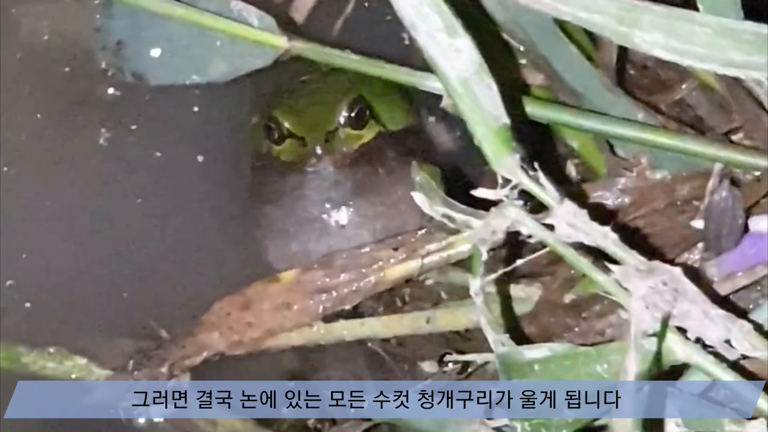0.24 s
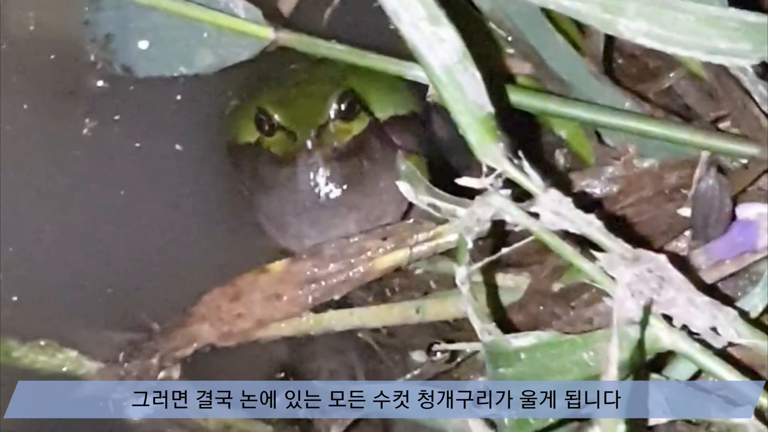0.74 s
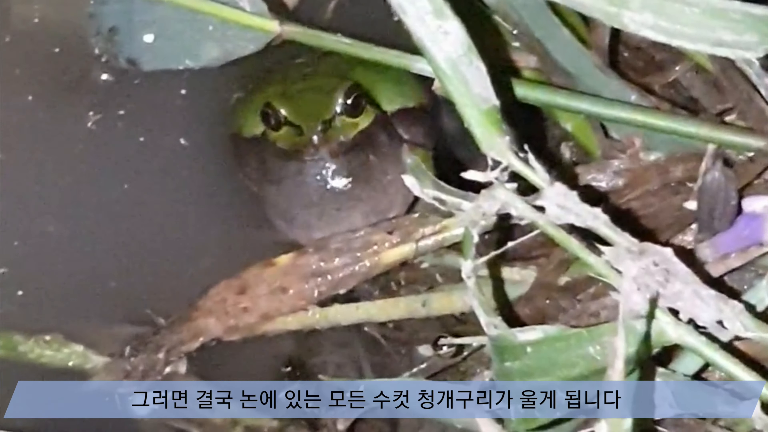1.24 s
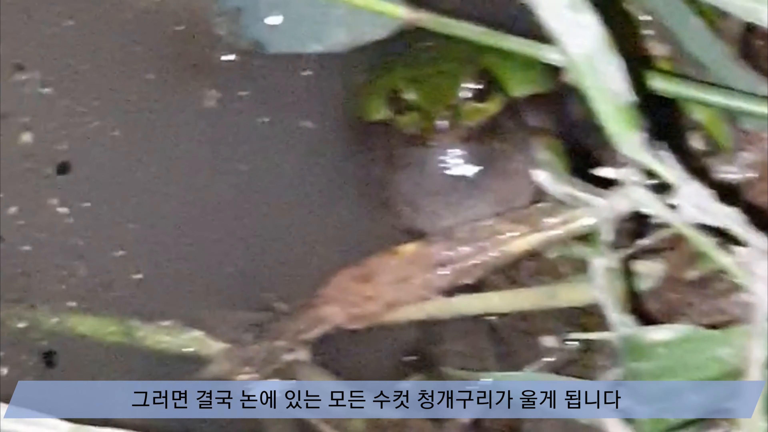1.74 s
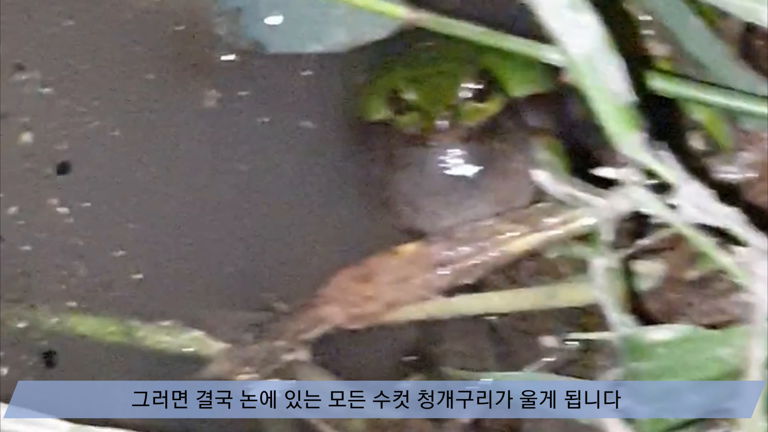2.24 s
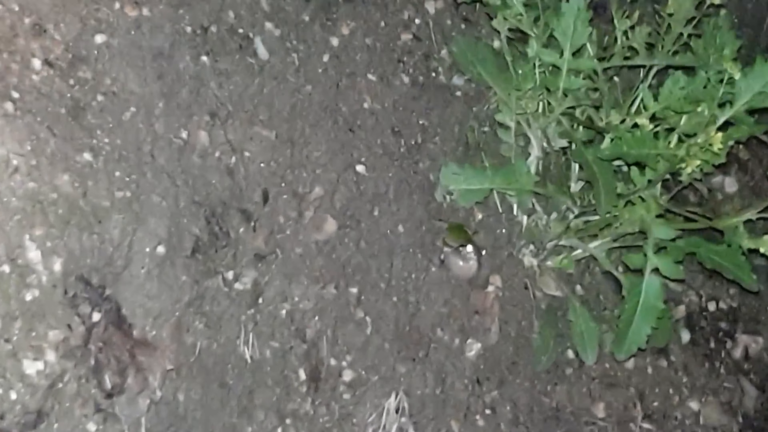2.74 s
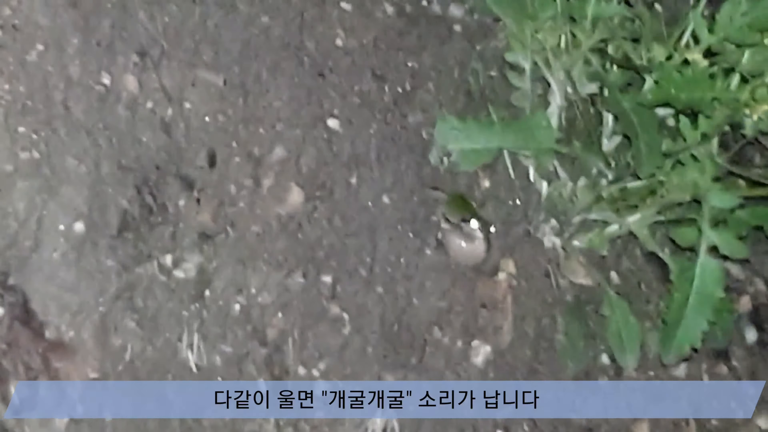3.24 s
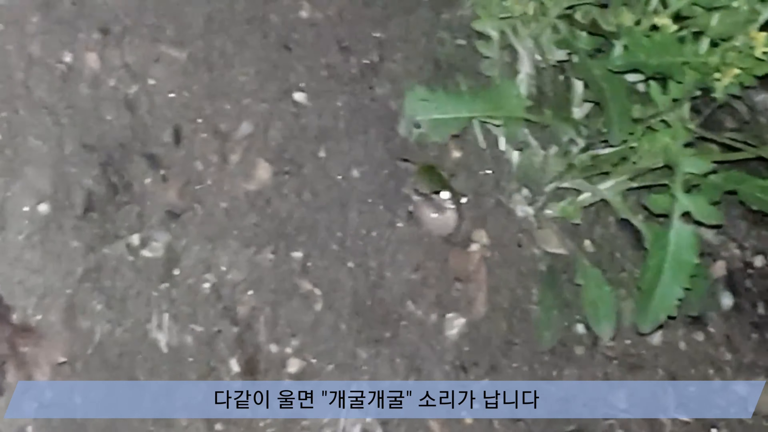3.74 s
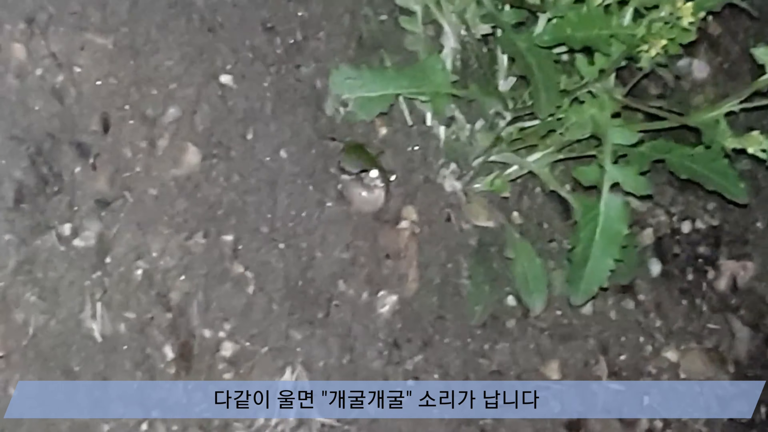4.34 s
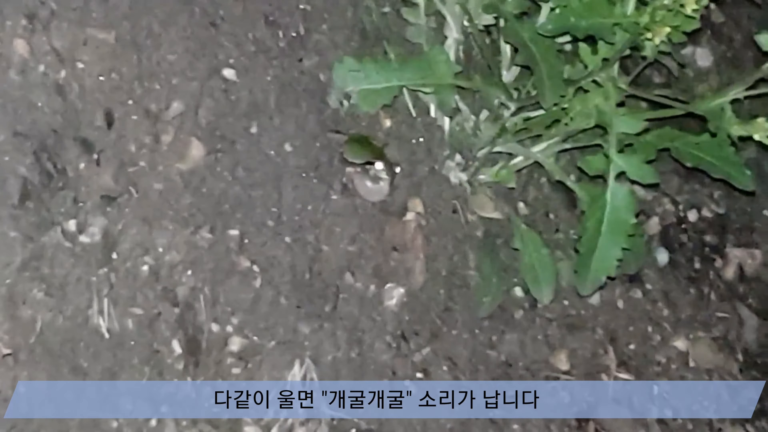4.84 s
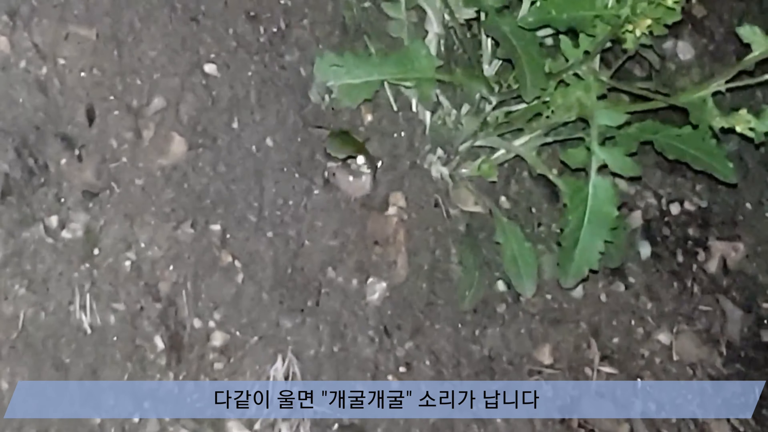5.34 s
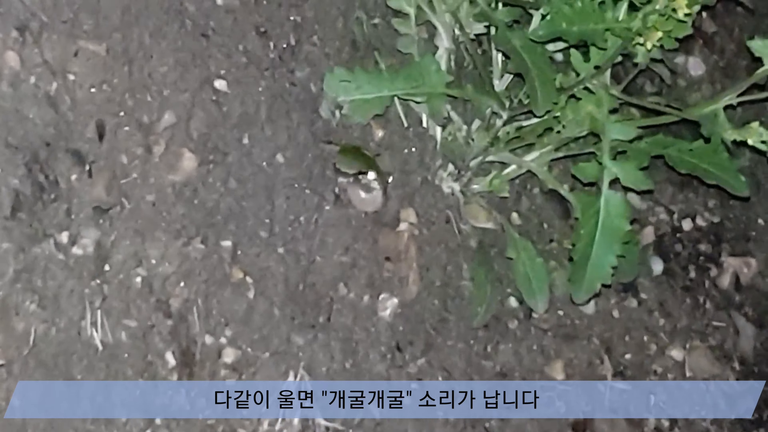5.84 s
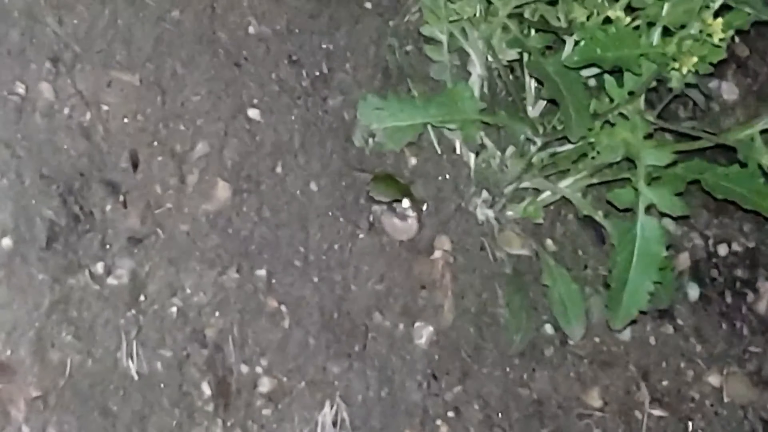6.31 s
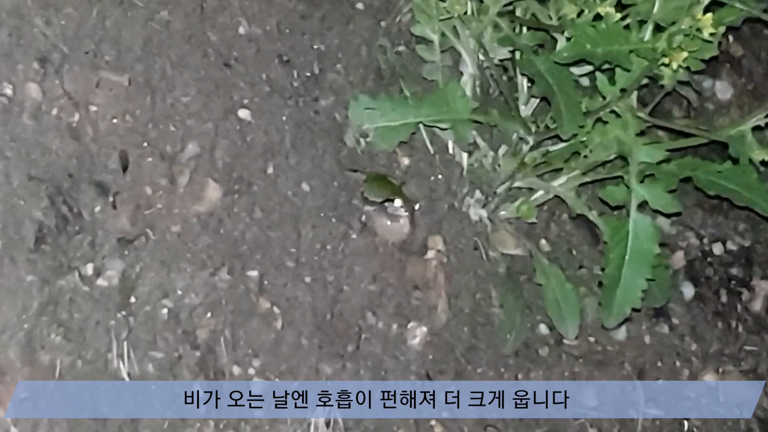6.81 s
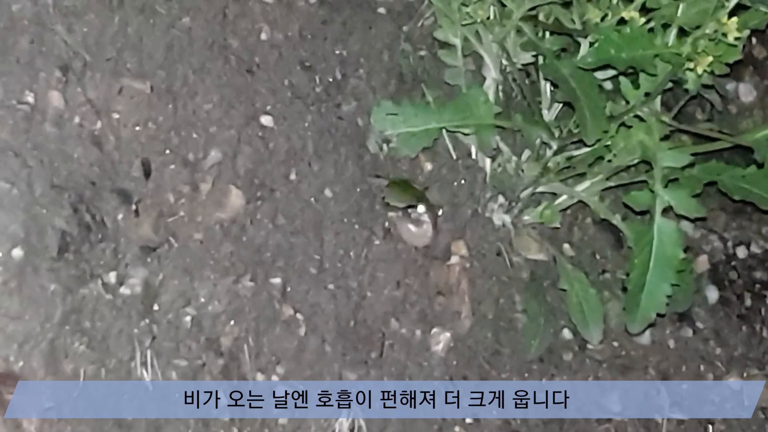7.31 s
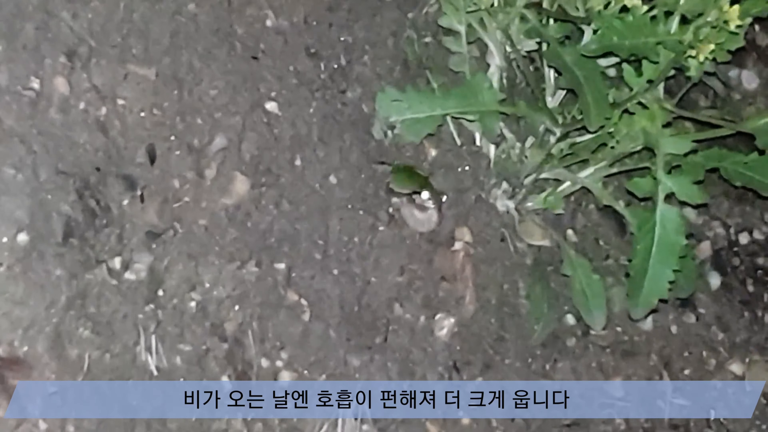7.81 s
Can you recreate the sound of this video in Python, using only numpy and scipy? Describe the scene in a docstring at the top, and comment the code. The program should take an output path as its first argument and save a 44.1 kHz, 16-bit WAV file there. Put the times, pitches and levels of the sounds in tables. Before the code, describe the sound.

Handheld stereo outdoors, two frog spots joined by an abrupt cut. First, six sharp, rattling croaks near the water, among several quieter frogs, chorus, hiss and buffeting wind. Then a tiny silent gap and a cleaner, quieter place where one near tree frog repeats brisk, rising, raspy calls, becoming strong halfway through, answered softly from behind.

```python
"""Pond edge, then bank, at night: tree frogs in stereo at two spots, a short silent cut between them.
Each call is a train of short vocal bursts that speeds up and rises in pitch, with a ringing sac and air hiss.
One frog is near at each spot; neighbours answer it with the same burst mechanism.
Behind: a blurred far chorus, a faint sagging hoot, an insect's wing tone, low wind rumble and night hiss."""
import sys
import numpy as np
from scipy import signal
from scipy.fft import rfft, irfft, next_fast_len
from scipy.io import wavfile
from scipy.ndimage import uniform_filter1d

SR = 44100
rng = np.random.default_rng(int(sys.argv[2]) if len(sys.argv) > 2 else 0)


def output_pcm(signal):
    """Save a mono or channel-first signal as 16-bit PCM at the path in sys.argv[1].

    Samples are clipped to [-1, 1] before scaling.
    """
    pcm = np.clip(np.atleast_2d(signal).T, -1, 1) * 32767
    wavfile.write(sys.argv[1], SR, np.round(pcm).astype(np.int16))


N = 355887

# All calls: (first burst [s], length [s], bursts [count], level [dB])
# All courses, in shares of the call:
#   pace (gap shrink [share], first gaps longer [share], settling [share], last gap shorter [share]),
#   swell (first burst [dB], rise [share], last burst [dB], fall [share]),
#   glide (base pitch [ratio], climb [ratio], first flat by [ratio], last flat by [ratio])
# All voices: (pitch at ratio 1 [Hz], swell [ms], dying [ms], partials 1, 2, ..),
#   partial: (left [dB], right [dB], left phase lead [rad])
# All sac rings: (pitch at ratio 1 [Hz], t60 [ms], left [dB], right [dB], left phase lead [rad])

# near frog at the water's edge: calls, course, voice, sac ring; columns as above
POND_CALLS = [(.0128, .0902, 16, -12), (.3704, .0933, 16, -12), (.669, .0906, 15, -12),
              (.9813, .0932, 16, -11.5), (1.5669, .0915, 16, -12), (2.3275, .093, 16, -12.5)]
POND_COURSE = ((.14, .42, .11, .3), (-12, .06, -4, .05), (.93, .11, .04, .05))
POND_VOICE = (1417, 1.84, 0.52, [(2, -3, .03), (1.5, -0.5, 2.8), (-22.5, -25.5, 0.34), (-22.5, -22, 1.8),
              (-29.5, -33, 0.42)])
POND_SAC = [(1140, 10, -17, -8, 0.084), (2286, 11.2, -13, -5.5, 0.15), (2532, 34, -18.5, -1, 2.64),
            (3290, 3.4, -14.5, -37, 0.69), (4575, 29, -27, -31, 1.3)]


def pond_frog():
    """Near frog at the water's edge: burst trains with the strongest ratio of air hiss to voice but one."""
    return frog(POND_CALLS, POND_COURSE, POND_VOICE, POND_SAC, air_db=-36)


# near frog on the bank: calls, course, voice, sac ring; columns as above
BANK_CALLS = [(2.5757, .0979, 15, -15), (2.8418, .0968, 15, -15), (3.1068, .0977, 15, -15),
              (3.3743, .0984, 15, -14.5), (3.6392, .0979, 15, -14.5), (3.9055, .0988, 15, -14.5),
              (4.1757, .0976, 15, -14), (4.4419, .1001, 15, -11.5), (4.7259, .0999, 15, -10),
              (5.1531, .1058, 16, -9.5), (5.5519, .1054, 16, -9.5), (5.8259, .0995, 15, -9.5),
              (6.0942, .0994, 15, -9.5), (6.3626, .0995, 15, -9.5), (6.7531, .1093, 16, -9.5),
              (7.0257, .0995, 15, -9.5), (7.2979, .1007, 15, -9.5), (7.5687, .1022, 15, -9.5),
              (7.8446, .1029, 15, -9.5)]
BANK_COURSE = ((.12, .23, .2, .6), (-8.5, .14, -6.5, .04), (.96, .08, .02, .07))
BANK_VOICE = (1687, 1.38, 1.02, [(-1, -4.5, 0.46), (-4.5, -20, 0.057), (-33, -35.5, -1.53),
              (-38.5, -35, -2.2), (-48.5, -49.5, 1), (-46, -51.5, 1)])
BANK_SAC = [(1462, 25, -13, -37.5, -0.033), (2413, 3.4, -10, -14.5, 0.017), (3087, 14.8, -9.5, -5, 0.56),
            (4032, 17.6, -33.5, -27, 0.84)]


def bank_frog():
    """Near frog on the bank: burst trains with a shorter swell and a longer dying than the pond frog's."""
    return frog(BANK_CALLS, BANK_COURSE, BANK_VOICE, BANK_SAC)


# frog behind the bank: calls, voice, sac ring; columns as above
ANSWER_CALLS = [(4.903, 0.096, 16, -30), (5.316, 0.094, 14, -29.5), (5.614, 0.093, 15, -29),
                (5.89, 0.095, 15, -29), (6.168, 0.094, 15, -29.5), (6.5122, .1, 16, -29),
                (6.803, .096, 15, -28.5), (7.08, .096, 15, -29.5), (7.346, .096, 15, -29),
                (7.634, 0.092, 15, -29.5), (7.928, 0.094, 15, -29)]
ANSWER_VOICE = (1675, 1.4, 1.0, [(-3, -7, 2.5), (-2.5, 5, 1.26), (-25, -23, -.3), (-40, -40, 1),
                (-27, -27, .5)])
ANSWER_SAC = [(1340, 99, -6.5, -16.5, 1.52), (2970, 14, -11.5, -4.5, .2)]
# call course of every frog but the two near ones; columns as above
FAR_COURSE = ((.27, .15, .2, 0), (-10, .2, -4, .03), (.94, .1, .03, .03))


def answering_frog():
    """Frog answering from behind the bank: softer burst trains, more air hiss for their level."""
    return frog(ANSWER_CALLS, FAR_COURSE, ANSWER_VOICE, ANSWER_SAC, air_db=-30.5)


# high-voiced neighbours of the pond frog: calls, voice; columns as above
HIGH_CALLS = [(.055, 0.087, 14, -31), (.275, .12, 14, -29), (.6, 0.091, 15, -31.5), (.92, 0.07, 14, -32.5),
              (1.19, 0.087, 15, -35.5), (1.476, .09, 14, -33), (1.772, 0.073, 14, -32.5),
              (2.04, 0.073, 13, -31.5)]
HIGH_VOICE = (1540, 1.35, 0.914, [(-3, -1, -2.3), (9.5, 8, 0.23), (-17, -19, -13), (-24, -34.5, 7.5),
              (-37, -45, -13)])
# sac ring of these neighbours and of the far chorus; columns as above
FAR_SAC = [(1239, 24.4, -7.5, -15.5, 1), (2026, 1.1, -10.5, -9, 1.7), (2990, 19, 7.5, -26.5, 2.9)]


def high_neighbours():
    """High-voiced neighbours of the pond frog: soft burst trains, second partial strongest."""
    return frog(HIGH_CALLS, FAR_COURSE, HIGH_VOICE, FAR_SAC)


# low-voiced neighbour of the pond frog: calls, voice; columns as above
LOW_CALLS = [(.18, 0.09, 15, -28), (.47, 0.071, 13, -29), (1.305, 0.09, 15, -28), (1.88, .095, 15, -28),
             (2.155, .065, 15, -25.5)]
LOW_VOICE = (1240, 3.2, 0.94, [(-6, -8, -1.9), (-17, -20, 2.8), (-15.5, -18, 1.5)])


def low_neighbour():
    """Low-voiced neighbour of the pond frog: bursts with a long swell and no sac ring."""
    return frog(LOW_CALLS, FAR_COURSE, LOW_VOICE, [])


AIR_DB, AIR_HZ = -41.5, 3870
WOBBLE_SHARE = .006  # pitch spread from burst to burst
DULLING_DB_PER_DB = 0.45  # lost above the first partial per dB that a burst is softer
LAST_DULL_DB, LAST_STRETCH_SHARE = -9, 2.4  # last burst: upper partials' loss, longer dying


def frog(calls, course, voice, sac, air_db=AIR_DB, level_spread_db=0.57, jitter_ms=0.084):
    """Every burst is a few cycles of the vocal folds that swell and are cut off; the sac rings on, air hisses."""
    hz, swell_ms, dying_ms, partials = voice
    rows = []
    for start, length, bursts, db in calls:
        gap, burst_db, ratio, last = course_of(round(bursts), *course)
        onset = np.cumsum(gap) - gap
        dull_db = DULLING_DB_PER_DB * burst_db + LAST_DULL_DB * last
        stretch = 1 + LAST_STRETCH_SHARE * last
        rows.append([start + length * onset / onset[-1], db + burst_db, ratio, dull_db, stretch])
    # one row per burst, samples along the second axis
    crest_s, db, ratio, dull_db, stretch = np.concatenate(rows, axis=1)[:, :, None]
    chance = rng.standard_normal((len(crest_s), 3, 1))
    crest_s = crest_s + (jitter_ms * chance[:, 2] - dying_ms / 2) / 1000
    index = (crest_s * SR).astype(int) + np.arange(-128, 384)
    t = index / SR - crest_s
    after_s = np.maximum(t, 0)

    swell = np.sin(np.pi / 2 * np.clip(1 + 1000 * t / swell_ms, 0, 1))
    shape = swell * np.exp(-(1000 * after_s / (dying_ms * stretch)) ** 2.08)
    angle = 2 * np.pi * ratio * (1 + WOBBLE_SHARE * chance[:, 0]) * t
    fade = swell ** 2 * np.clip((t[:, -1:] - t) / 0.001, 0, 1)

    out, puff = np.zeros((2, N + SR)), np.zeros(N + SR)
    breath = swell ** 4 * (0.17 + np.exp(-after_s / 0.0046)) * fade
    np.add.at(puff, index, breath * undb(db + air_db + dull_db))
    burst_gain = undb(db + level_spread_db * chance[:, 1])
    for side, lead in enumerate((.5, -.5)):
        wave = np.zeros(t.shape)
        for k, partial in enumerate(partials):
            gain = undb(partial[side] + (k > 0) * dull_db)
            narrowed = shape ** (1 + 0.057 * k)  # upper partials live nearer the crest
            wave += gain * narrowed * np.cos((k + 1) * hz * angle + lead * partial[2])
        for k, (ring_hz, t60_ms, left_db, right_db, phase) in enumerate(sac):
            decay = undb((left_db, right_db)[side] - 60 * 1000 * after_s / t60_ms)
            wave -= (-1) ** k * decay * fade * np.sin(ring_hz * angle + lead * phase)
        np.add.at(out[side], index, wave * burst_gain)
    return out[:, :N], puff[:N]


def course_of(count, pace, swell, glide):
    """Gap, level, pitch ratio, lastness per burst: slow, soft, flat; then faster, higher; the last drops."""
    shrink, linger, settle, hurry = pace
    first_db, rise, last_db, fall = swell
    start, climb, first_flat, last_flat = glide
    place = np.linspace(0, 1, count)
    early = np.exp(-place / rise)
    late = np.exp((place - 1) / fall)
    gap = 1 - shrink * place + linger * np.exp(-place / settle) - hurry * late
    burst_db = first_db * early + last_db * late
    ratio = start + climb * place - first_flat * early - last_flat * late
    return gap, burst_db, ratio, late ** 2


def breathy(*frogs):
    """Voices plus the hiss of their air; so small a body radiates no bass, hence the high-pass."""
    hiss = coloured([(AIR_HZ / 2, -40), (AIR_HZ, 0), (8000, -8), (12000, -19), (16000, -28)])
    voices = sum(voice + hiss * puff for voice, puff in frogs)
    return signal.sosfilt(signal.butter(5, 1100, "high", fs=SR, output="sos"), voices)


SCATTER_T60_S, SCATTER_DB = .07, -15


def surroundings(x):
    """Scattering off water, soil and grass: a soft, dense noise tail added to the direct sound."""
    return x + undb(SCATTER_DB) * smear(x, SCATTER_T60_S)


FAR_HZ, FAR_SPREAD_SHARE, FAR_T60_S = 1515, .05, 0.33
# mean partials 1, 2, .. of a far frog: (level [dB])
FAR_PARTIALS_DB = [-7.5, -0.5, -29.5, -29, -35.5]
# far chorus: (time [s], level [dB])
FAR_LEVEL = [(0, -43), (.8, -35), (2.3, -36.5), (2.5, -50.5), (4.2, -50.5), (4.7, -43), (6.4, -43),
             (7.2, -45.5), (8.07, -46)]


def chorus(count=15):
    """Far frogs, each with its own pitch, pace, level and pan, blurred by the field's scattering."""
    frogs = []
    for tune, pace, near, pan in rng.standard_normal((count, 4)):
        gaps_s = .3 + 0.017 * pace + .08 * rng.exponential(size=40) ** 2
        starts = np.maximum(np.cumsum(gaps_s) - .2, .01)
        calls = [(s, .095, 15, 1.12 * near) for s in starts if s < N / SR]
        partials = [(db + 2 * pan, db - 2 * pan, pan) for db in FAR_PARTIALS_DB]
        voice = (FAR_HZ * (1 + FAR_SPREAD_SHARE * tune), 2.2, 1.2, partials)
        frogs.append(frog(calls, FAR_COURSE, voice, FAR_SAC))
    out = breathy(*frogs)
    return unit(0.5 * out + smear(out, FAR_T60_S)) * undb(curve(FAR_LEVEL)[0])


HOOT_START_S, HOOT_END_S, HOOT_EDGE_S, HOOT_DB = .7, 2.33, 0.052, -62.5
HOOT_HZ, HOOT_SAGS_FROM_S, HOOT_SAG_HZ_PER_S = 651, 1.5, 28
HOOT_WAVER_DB, HOOT_WAVER_HZ = 2, 5.6


def hoot():
    """A faint far sine that holds, then sags slowly, roughened by smoothed noise on its level."""
    t = np.arange(N) / SR
    sag_hz = HOOT_SAG_HZ_PER_S * np.maximum(t - HOOT_SAGS_FROM_S, 0)
    hz = HOOT_HZ - sag_hz + HOOT_WAVER_HZ * walk(8.1)
    edges = np.clip(np.minimum(t - HOOT_START_S, HOOT_END_S - t) / HOOT_EDGE_S, 0, 1)
    level = undb(HOOT_DB + HOOT_WAVER_DB * walk(13)) * edges
    rough = 1 + 0.62 * unit(uniform_filter1d(rng.standard_normal((2, N)), size=900))
    phase = 2 * np.pi * np.cumsum(hz) / SR + np.array([[0], [1.2]])
    return np.sqrt(2) * level * rough * np.sin(phase)


FLY_PASSES_S, FLY_WING_HZ = 4.14, 158
# wing partials 1, 2, ..: (peak [dB], half length [s], delay [s])
FLY_PARTIALS = [(-54, .02, .006), (-61, .045, -.01), (-65, .035, 0), (-74, .04, 0), (-72, .025, -.025)]


def fly():
    """A small insect brushes past on the right: wing-beat harmonics, each under a brief bell-shaped level."""
    t = np.arange(N) / SR
    angle = 2 * np.pi * np.cumsum(FLY_WING_HZ * (1 + .012 * walk(30))) / SR
    buzz = np.zeros(N)
    for k, (db, half_s, delay_s) in enumerate(FLY_PARTIALS):
        bell = np.exp(-((t - FLY_PASSES_S - delay_s) / half_s) ** 2)
        buzz += np.sqrt(2) * undb(db) * bell * np.sin((k + 1) * angle)
    return buzz * undb([[-28], [0]])  # left, right


# wind level: (time [s], level [dB])
WIND_LEVEL = [(0, -49), (.75, -53.5), (.85, -62), (.93, -42), (1.25, -51.5), (1.6, -64.5), (1.79, -47.5),
              (1.93, -84), (2.04, -48), (2.4, -63.5), (4.4, -66.5), (5.1, -58), (5.94, -61), (6.1, -78),
              (6.3, -59), (7.25, -64), (7.5, -60), (8.07, -55.5)]
# rumble spectrum at the pond: (frequency [Hz], relative density [dB per Hz])
WIND_POND = [(12, -40), (20, -20), (43, -0.5), (65, -0.5), (105, -6), (157, -24), (211, -23), (357, -47),
             (500, -45), (650, -69), (1100, -120)]
# rumble spectrum on the bank: (frequency [Hz], relative density [dB per Hz])
WIND_BANK = [(12, -42), (20, -21.5), (39, -8.5), (59, 6), (72, 0), (91, -14), (155, -15), (182, -15.5),
             (259, -27.5), (300, -26.5), (390, -41.5), (660, -120)]
POND_PAN_DB, BANK_PAN_DB = -11, 3  # left gain minus right gain
POND_BUFFET_DB, BANK_BUFFET_DB, BUFFETS_PER_S = 5.5, 3.5, 22  # quick chance swings
WIND_SHARED = .35  # correlation of the two sides before spot changes


def wind(at_pond):
    """Low rumble of wind on the two microphone ports: shaped noise, partly shared between them."""
    rumble = np.where(at_pond, coloured(WIND_POND), coloured(WIND_BANK))
    rumble[1] = WIND_SHARED * rumble[0] + np.sqrt(1 - WIND_SHARED ** 2) * rumble[1]
    pan_db = np.where(at_pond, POND_PAN_DB, BANK_PAN_DB)
    buffet_db = np.where(at_pond, POND_BUFFET_DB, BANK_BUFFET_DB) * walk(BUFFETS_PER_S)
    return rumble * undb(curve(WIND_LEVEL)[0] + buffet_db + np.array([pan_db, -pan_db]) / 2)


# night air spectrum: (frequency [Hz], relative density [dB per Hz])
NIGHT = [(60, -32.5), (130, -3), (220, -11.5), (450, -15), (900, -9), (2000, 3.5), (4500, -8), (7000, -31),
         (11000, -31), (16000, -25.5)]
POND_NIGHT_DB, BANK_NIGHT_DB = -50.5, -61


def night_air(at_pond):
    """Hiss of the night air: steady shaped noise, unrelated left and right, one level per spot."""
    return coloured(NIGHT) * undb(np.where(at_pond, POND_NIGHT_DB, BANK_NIGHT_DB))


def undb(db):
    """Amplitude ratio of a level in dB."""
    return 10 ** (np.asarray(db) / 20)


def unit(x):
    """Scaled to an RMS of 1."""
    return x / np.sqrt(np.mean(x ** 2))


def curve(rows):
    """Table columns interpolated over time."""
    s, *columns = np.transpose(rows)
    return [np.interp(np.arange(N) / SR, s, c) for c in columns]


def coloured(points):
    """Two unrelated noises with the given spectrum, RMS 1 overall."""
    hz, db = np.transpose(points)
    size = next_fast_len(N)
    bin_hz = np.arange(size // 2 + 1) * SR / size
    gain = undb(np.interp(np.log(bin_hz + 1), np.log(hz), db))
    return unit(irfft(rfft(rng.standard_normal((2, size))) * gain, size)[:, :N])


def smear(x, t60_s):
    """Dense scattering that dies away, different on each side; tail energy averages 1."""
    t = np.arange(int(t60_s * SR)) / SR
    tail = rng.standard_normal((2, len(t))) * undb(-60 * t / t60_s)
    return signal.fftconvolve(x, tail / np.sqrt(np.sum(tail ** 2) / 2), axes=1)[:, :N]


def walk(rate):
    """Random swings, RMS 1: noise averaged twice over 1/rate seconds."""
    size = int(SR / rate)
    return unit(uniform_filter1d(uniform_filter1d(rng.standard_normal(N), size=size), size=size))


CUT_S, CUT_TAIL_S, CUT_TAIL_DB, BACK_S, BACK_FADE_S = 2.3835, .03, -20, 2.459, .012
TOP_HZ = 15800


def scene():
    """Pond, then bank: frogs with scattering kept to their own spot, over the background."""
    frogs = breathy(pond_frog(), bank_frog(), answering_frog(), high_neighbours(), low_neighbour())
    at_pond = np.arange(N) / SR < CUT_S + CUT_TAIL_S
    # no pond tail carries over to the bank
    frogs = np.where(at_pond, surroundings(frogs), surroundings(frogs * ~at_pond))
    return frogs + chorus() + hoot() + fly() + wind(at_pond) + night_air(at_pond)


def record(dry):
    """The cut: a drop, a short dying tail, silence, a quick soft fade in, full level; then a low-pass."""
    t = np.arange(N) / SR
    tail = undb(CUT_TAIL_DB) * np.clip(1 - (t - CUT_S) / CUT_TAIL_S, 0, 1) ** 2
    fade_in = np.clip(1 + (t - BACK_S) / BACK_FADE_S, 0, 1) ** 2
    back = np.where(t < BACK_S, undb(CUT_TAIL_DB), 1) * fade_in
    cut = dry * np.where(t < CUT_S, 1, tail + back)
    return signal.sosfilt(signal.ellip(8, .2, 70, TOP_HZ, fs=SR, output="sos"), cut)


dry = scene()
out = record(dry)
output_pcm(out)
```